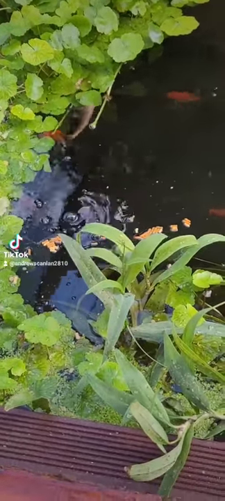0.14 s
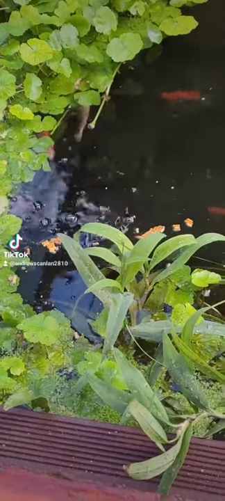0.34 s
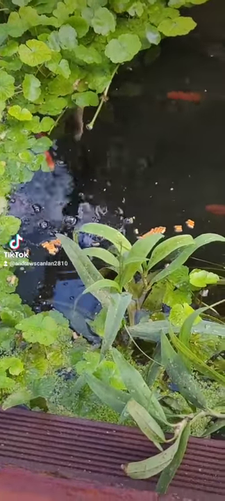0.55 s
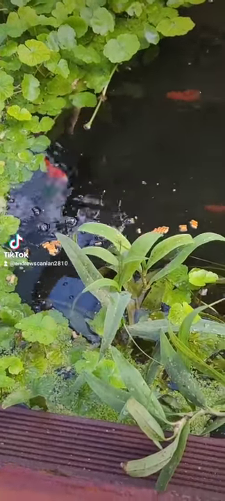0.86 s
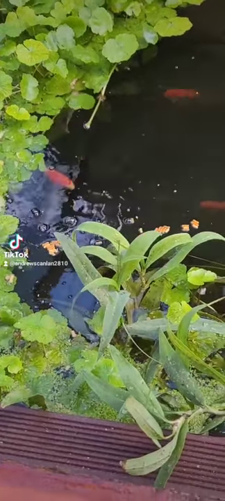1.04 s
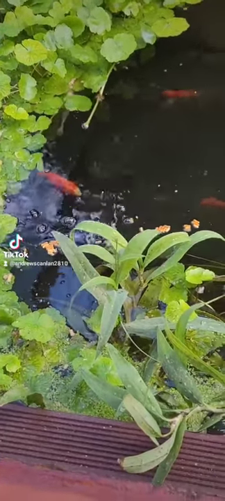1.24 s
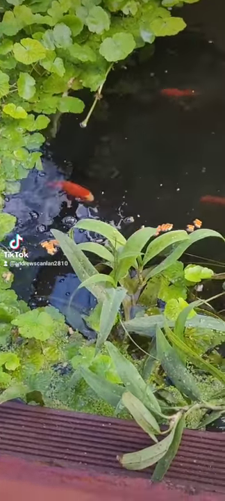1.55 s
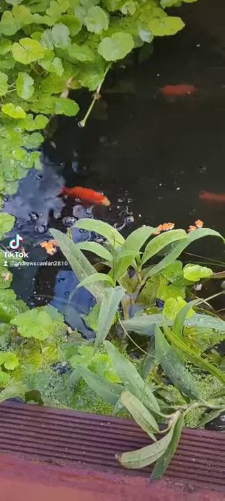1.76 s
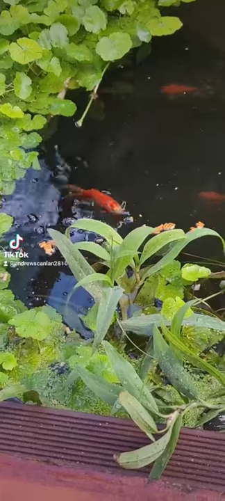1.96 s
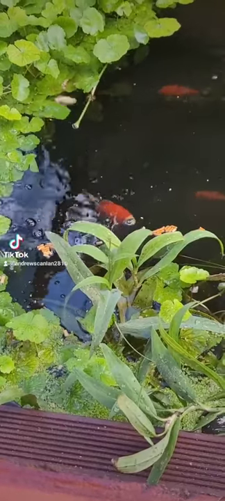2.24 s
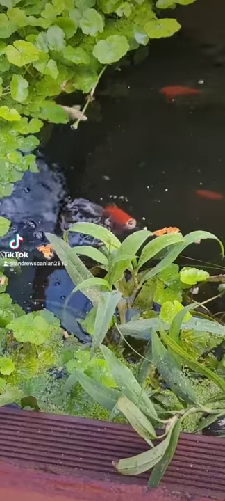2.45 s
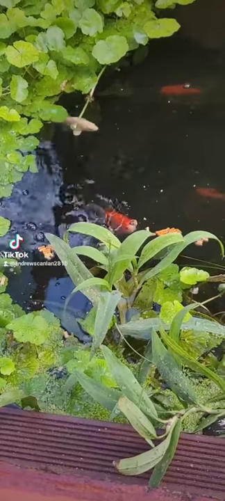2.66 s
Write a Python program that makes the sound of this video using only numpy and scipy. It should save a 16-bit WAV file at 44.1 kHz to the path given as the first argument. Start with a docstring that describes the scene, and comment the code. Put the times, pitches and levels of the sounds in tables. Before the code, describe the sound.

Faint pond bubbling and light spatters, with a humming pump and one low bump.

```python
"""A garden pond pump hums steadily, with a thin whine above it, all at multiples of the mains rate.
Soft outdoor air hisses and rumbles behind it. Small bubbles pop with a brief rising ring and water
spatters faintly, each sound blurred as it scatters round the pond. A light puff of wind rumbles on
the microphone; near the end its casing takes one low bump and a few smaller nudges."""
import sys
import numpy as np
from scipy import signal
from scipy.io import wavfile

SR = 44100
rng = np.random.default_rng(int(sys.argv[2]) if len(sys.argv) > 2 else 0)


def transcribe(u):
    """Save the signal u as a 16-bit wav file named by the first command-line argument.

    u: samples, shape (n,) or (channels, n), limited to [-1, 1]; the rate is SR.
    q: integer samples, one column per channel.
    """
    v = np.clip(np.atleast_2d(u).T, -1, 1)
    q = np.round(v * 32767).astype(np.int16)
    wavfile.write(sys.argv[1], SR, q)


N = 123480

# How alike the surroundings sound in both ears: (frequency [Hz], likeness [0 unrelated, 1 or more same])
EAR_LIKENESS = [(60, 1.8), (290, 1.04), (640, 0.7), (1400, 0.31), (3000, 0.28), (6700, 0.03), (14000, 0.03)]
# Which side the surroundings lean to: (frequency [Hz], left minus right [dB])
EAR_BALANCE = [(60, -4.5), (380, -0.5), (700, -1), (2000, -1.5), (4400, 0.5), (8000, 2.5), (14000, 6)]


def from_db(db):
    """Turn decibels into a number to multiply a sound by."""
    return 10 ** (np.asarray(db) / 20)


def rms_one(x):
    """Scale a signal so that its average size (rms) is 1."""
    return x / np.sqrt(np.mean(x ** 2) + 1e-20)


def pan(db):
    """Left and right gains that make the left louder by db and keep the total power."""
    return rms_one(from_db(np.array([[db], [-db]]) / 2))


def at_hz(points, hz):
    """Read between the rows of a (frequency, value) table, with octaves evenly spaced."""
    frequencies, values = np.transpose(points)
    return np.interp(np.log(hz), np.log(frequencies), values)


def band(x, low, high):
    """Keep the part of a sound between two frequencies in Hz."""
    return signal.sosfilt(signal.butter(2, [low, min(high, .48 * SR)], "band", fs=SR, output="sos"), x)


def drift(rate_hz):
    """A smooth random wander of typical size 1; a higher rate wanders faster."""
    step, warm_up = 40, 2000  # one value every 40 samples; the first 2000 values are dropped
    memory = np.exp(-2 * np.pi * step * rate_hz / SR)
    jitter = rng.standard_normal(N // step + warm_up + 2)
    slow = signal.lfilter([1], [1, -2 * memory, memory * memory], jitter)[warm_up:]
    return np.interp(np.arange(N) / step, np.arange(len(slow)), rms_one(slow))


def add(out, start_s, sound):
    """Mix a sound into out at a given time."""
    i = max(int(start_s * SR), 0)
    out[..., i:i + sound.shape[-1]] += sound[..., :max(N - i, 0)]


def noise(spectrum, low_hz, high_hz, flicker_db, likeness):
    """Stereo noise of size 1, built from narrow bands that each flicker in level on their own."""
    out, edges = 0, 20 * 2 ** np.arange(0, 10, .4)
    white = rng.standard_normal((2, 2, N + SR // 4))
    for k, (low, high) in enumerate(zip(edges, edges[1:])):
        hz, flicker = np.sqrt(low * high), drift(rate_hz=13.6)
        if low_hz < hz < high_hz:
            shared, opposed = band(white[k % 2], low, high)[:, -N:]
            alike = np.clip(at_hz(likeness, hz), -1, 1)
            ears = np.sqrt(1 + alike) * shared + np.sqrt(1 - alike) * opposed * [[1], [-1]]
            gain = from_db(at_hz(spectrum, hz) + flicker_db * flicker)
            out = out + gain * pan(at_hz(EAR_BALANCE, hz)) * ears
    return rms_one(out)


def pump(mains_hz=50, hum_waver_db=.15, whine_waver_db=.5):
    """The pump gives steady tones at multiples of the mains rate: a low hum and a thin whine."""
    # The pump's tones, one list a column: (pitch [times the mains rate], level [dB], left minus right [dB])
    multiples = [2, 4, 18, 19, 20, 25, 31, 32]
    levels_db = [-36, -56.5, -71.5, -63.5, -49.5, -72.5, -70, -73]
    pans_db = [0, 0, 3, 2.4, -2.4, 0, -14, -9]
    t, out = np.arange(N) / SR, 0
    for multiple, db, pan_db in zip(multiples, levels_db, pans_db):
        waver_db = (hum_waver_db if multiple == 2 else whine_waver_db) * drift(rate_hz=15)
        tone = np.sqrt(2) * np.sin(2 * np.pi * (multiple * mains_hz * t + rng.random()))
        out = out + pan(pan_db) * from_db(db + waver_db) * tone
    return out


def housing(centre_hz=974, width_hz=150, level_db=-65.5):
    """The pump's housing rings faintly, making a narrow rush around the whine."""
    rush = band(rng.standard_normal(N), centre_hz - width_hz / 2, centre_hz + width_hz / 2)
    return from_db(level_db) * rms_one(rush)


def air(hiss_db=-51.5, rumble_db=-47.5):
    """Outdoor air: an even hiss over a low rumble."""
    # The hiss of still air: (frequency [Hz], relative level [dB])
    hiss_spectrum = [(400, -1), (650, 1.5), (950, 1), (1300, -3), (2000, -9), (3000, -14), (4500, -12.5),
                     (6500, -16), (9000, -19), (12000, -19.5), (15000, -13.5)]
    # The low outdoor rumble: (frequency [Hz], relative level [dB])
    rumble_spectrum = [(25, -30), (55, 9), (100, -2), (150, -5.5), (270, -1.5), (380, -11), (520, -41)]
    hiss = noise(hiss_spectrum, 350, 18000, flicker_db=1.59, likeness=EAR_LIKENESS)
    rumble = noise(rumble_spectrum, 20, 600, flicker_db=2.05, likeness=EAR_LIKENESS)
    return from_db(hiss_db) * hiss + from_db(rumble_db) * rumble


def scatter(t, fade_s, rise_s=0.0027):
    """Sound scattered round the pond swells quickly, then falls by 60 dB in fade_s."""
    t = np.maximum(t, 0)
    return (1 - np.exp(-t / rise_s)) * np.exp(-np.log(1000) * t / fade_s)


def bubble(hz, db, pan_db, ring_db, ring_cycles=10, rise_per_s=0.99, tail_width=0.21):
    """A bubble rings briefly, rising in pitch, and leaves a scattered tail that differs in each ear."""
    t = np.arange(SR // 4) / SR
    tone = np.sin(2 * np.pi * hz * t * (1 + rise_per_s * t / 2))
    ring = tone * np.exp(-t * hz / ring_cycles) * (1 - np.exp(-t * hz))
    ring_gain = from_db(ring_db - 2.5 * np.log2(hz / 1940))  # small, high bubbles ring less clearly
    white = rng.standard_normal((2, len(t)))
    tail = rms_one(band(white, hz * (1 - tail_width / 2), hz * (1 + tail_width / 2)))
    fade_s = 0.24 * min(hz / 3800, 1) ** 0.34  # below 3800 Hz the tails die sooner
    return from_db(db) * pan(pan_db) * (ring_gain * ring + tail * scatter(t, fade_s))


def pops():
    """Single bubbles pop at the surface, each with its own pitch."""
    # The bubbles: (time [s], pitch [Hz], tail level [dB], ring over tail before the pitch's effect [dB])
    bubbles = [(.012, 1840, -60, 13), (.087, 3250, -59.5, 12), (.094, 3800, -57, 12.5),
               (.151, 3500, -59, 13), (.156, 4140, -59.5, 15), (.190, 10900, -54, 0),
               (.323, 2076, -58, 11.5), (.335, 4050, -55, 4), (0.465, 3800, -52, 3), (.492, 4050, -55, 9),
               (.530, 14200, -58, 0), (.550, 7200, -62, 0), (.642, 6800, -60.5, 8), (.673, 3250, -62, 10),
               (.698, 2300, -61, 8), (.705, 10600, -55, 3), (.778, 4500, -66, 9), (.910, 3800, -55, 6),
               (1.128, 1990, -61, 14), (1.153, 4100, -55.5, 3), (1.180, 4070, -56, 3), (1.190, 784, -53, 7),
               (1.282, 5500, -54.5, 13), (1.388, 5570, -59, 6), (1.497, 3840, -53.5, 6),
               (1.547, 2260, -48.5, 3), (1.563, 9300, -58, 3), (1.677, 3700, -54, 4),
               (1.708, 5170, -56.5, 1), (1.845, 5900, -61, 15), (1.922, 4000, -58.5, 11),
               (2.053, 5850, -61.5, 18), (2.144, 3920, -58, 9), (2.150, 2060, -52, 0),
               (2.190, 10100, -56.5, 6), (2.370, 2820, -51, 0), (2.676, 5050, -55.5, 12),
               (2.748, 2040, -60.5, 16), (2.750, 2800, -53.5, 3), (2.768, 5200, -56.5, 12)]
    # Where they pop, the finest furthest left: (pitch [Hz], left minus right [dB])
    sides = [(800, 3), (2100, -5), (3200, 0.5), (6000, 1.5), (9500, 7)]
    out = np.zeros((2, N))
    for start_s, hz, db, ring_db in bubbles:
        add(out, start_s, bubble(hz, db, at_hz(sides, hz), ring_db))
    return out


def fizz(bubbles_per_s=46, level_db=-68, low_hz=2215, high_hz=8040):
    """Many fainter bubbles pop at random times and pitches."""
    out = np.zeros((2, N))
    for _ in range(int(bubbles_per_s * N / SR)):
        hz = low_hz * (high_hz / low_hz) ** rng.random()
        start_s = rng.random() * N / SR
        add(out, start_s, bubble(hz, level_db + rng.normal(), at_hz(EAR_BALANCE, hz), ring_db=6))
    return out


def spatters():
    """Water spatters in little bursts of hiss that scatter round the pond."""
    # The small splashes: (time [s], level [dB])
    splashes = [(.086, -52), (.193, -53), (.495, -56), (.700, -56), (1.160, -54.5), (1.279, -50),
                (1.335, -53.5), (1.385, -53.5), (1.555, -52.5), (1.705, -52.5), (1.940, -56), (2.184, -51),
                (2.355, -53.5), (2.418, -51.5), (2.482, -53.5)]
    # The hiss of their spray: (frequency [Hz], relative level [dB])
    spray_spectrum = [(1200, -7), (2500, 3.5), (5000, 2.5), (8000, -1.5), (14000, -5)]
    t = np.arange(N) / SR
    power = sum((from_db(db) * scatter(t - start_s, fade_s=0.25)) ** 2 for start_s, db in splashes)
    return np.sqrt(power) * noise(spray_spectrum, 1200, 18000, flicker_db=1.5, likeness=EAR_LIKENESS)


def wind():
    """A light puff buffets the microphone's two openings unevenly, mostly the right one."""
    # The course of the puff: (time [s], base level [dB], left minus right [dB])
    puff = [(1.18, -91, -12), (1.255, -38.5, -1), (1.44, -36, -12), (1.545, -35.5, -13), (1.585, -30, -15),
            (1.635, -31, -5), (1.70, -46, -5), (1.82, -48, 4), (1.93, -35.5, 11), (2.08, -51, 9),
            (2.42, -44, -1), (2.56, -29, -15), (2.68, -39, -14), (2.73, -38.5, 1), (2.8, -40, -8)]
    # Its rumble: (frequency [Hz], relative level [dB])
    puff_spectrum = [(20, -15), (40, -1), (62, 0.5), (100, -6), (170, -21), (300, -25), (600, -91)]
    # The deepest swirls push the openings opposite ways: (frequency [Hz], likeness [-1 opposite, 1 same])
    swirl_likeness = [(70, -.45), (250, .4)]
    times, db, pan_db = np.transpose(puff)
    centre_db = db - np.abs(pan_db) / 3  # turned down where the puff is one-sided
    ears_db = [np.interp(np.arange(N) / SR, times, centre_db + side * pan_db / 2) for side in (1, -1)]
    return from_db(ears_db) * noise(puff_spectrum, 20, 600, flicker_db=2.5, likeness=swirl_likeness)


def bumps(low_hz=27, muffle_hz=680):
    """Soft contacts push on the microphone's casing, whose low tones die almost at once."""
    # Bump and nudges: (time [s], peak before muffling [dB], contact length [s], left minus right [dB])
    contacts = [(2.4836, -9, 0.0043, -8), (2.496, -14, .012, -20), (2.525, -20.5, .0041, -21),
                (2.5362, -19, .0024, -21), (2.545, -20.5, .0023, -19), (2.563, -25.5, 0.0086, -11),
                (2.58, -21, 0.0036, -20), (2.617, -27.5, 0.0021, -11), (2.649, -24.5, 0.0031, -12),
                (2.657, -17.5, 0.0037, -16), (2.674, -21.5, 0.0097, -25)]
    # The casing's own dull tones: (pitch [Hz], relative level [dB], time to fall by 60 dB [s])
    casing_tones = [(46.7, -4.5, 0.08), (129.2, 5, 0.052), (188, 5.5, 0.017), (304, 1, 0.032),
                    (457, -13, 0.015)]
    t, out, casing = np.arange(SR // 5) / SR, np.zeros((2, N)), 0
    for k, (hz, db, fade_s) in enumerate(casing_tones):
        tone = np.sin(2 * np.pi * hz * t) * np.exp(-np.log(1000) * t / fade_s)
        casing = casing + (-1) ** (k + 1) * from_db(db) * tone  # neighbours start in opposite directions
    for time_s, db, contact_s, pan_db in contacts:
        push = np.sin(np.pi * np.minimum(t / contact_s, 1)) ** 2
        thud = signal.fftconvolve(push, casing)[:len(t)]
        add(out, time_s - contact_s / 2, from_db(db) * pan(pan_db) * thud / np.abs(thud).max())
    return band(out, low_hz, muffle_hz)


def scene():
    """All the sounds add up at the microphone."""
    return pump() + housing() + air() + pops() + fizz() + spatters() + wind() + bumps()


def record(dry):
    """The highest treble is cut off steeply."""
    cutoff_hz = 15450
    return signal.sosfilt(signal.ellip(18, .1, 90, cutoff_hz, fs=SR, output="sos"), dry)


dry = scene()
out = record(dry)
transcribe(out)
```